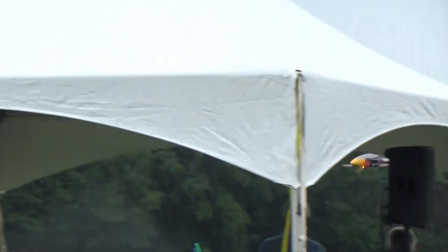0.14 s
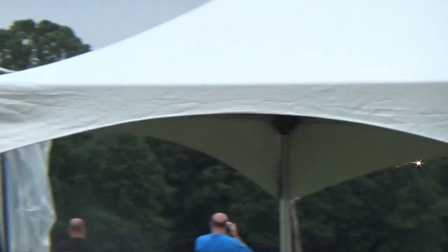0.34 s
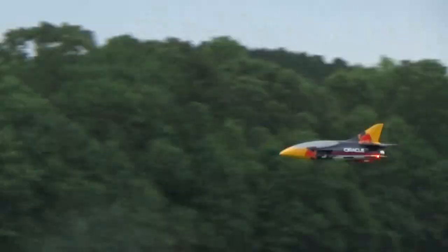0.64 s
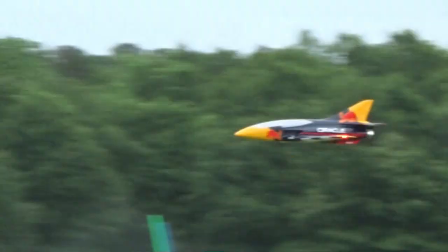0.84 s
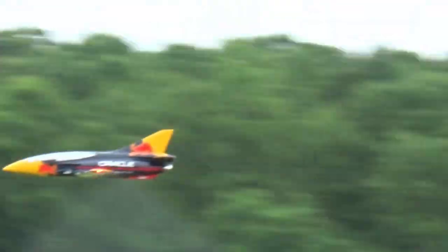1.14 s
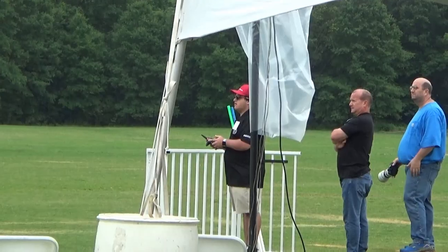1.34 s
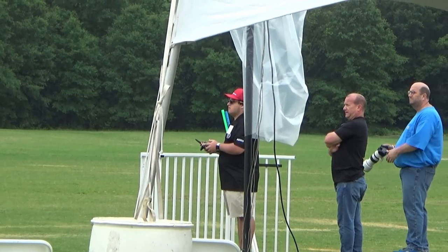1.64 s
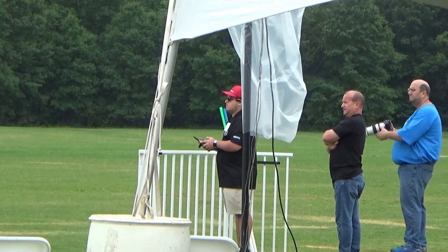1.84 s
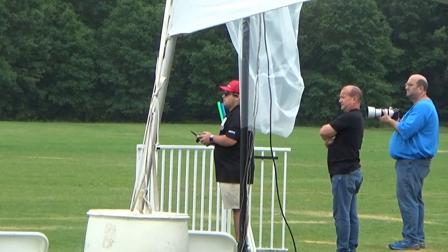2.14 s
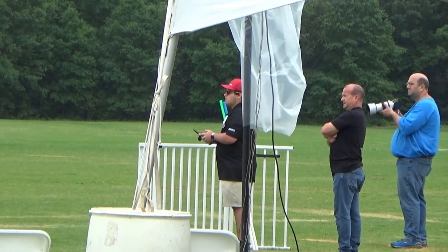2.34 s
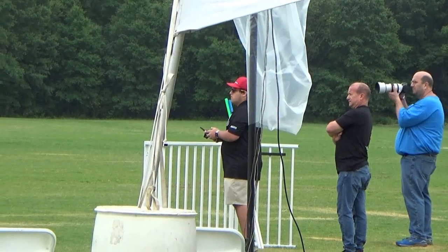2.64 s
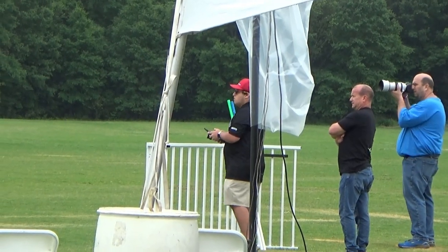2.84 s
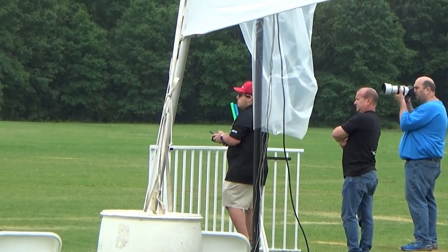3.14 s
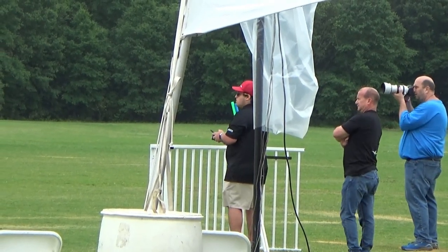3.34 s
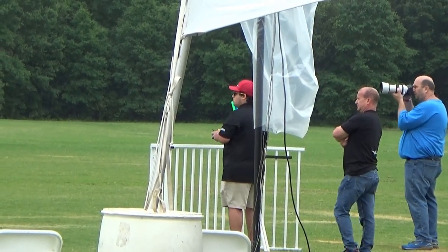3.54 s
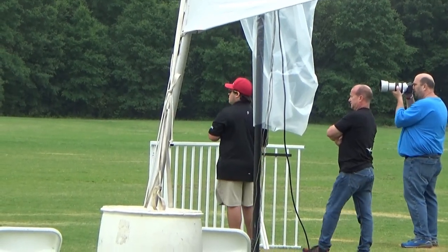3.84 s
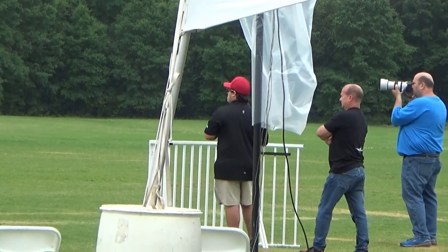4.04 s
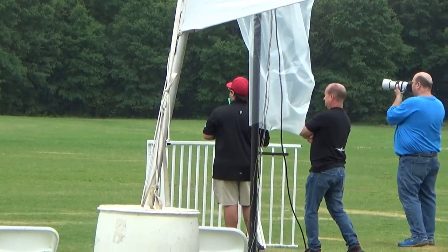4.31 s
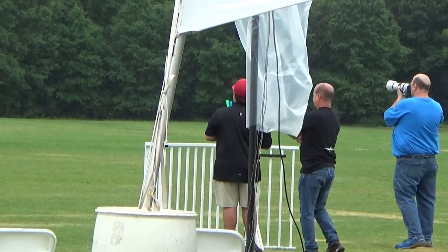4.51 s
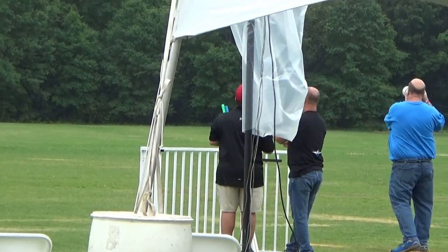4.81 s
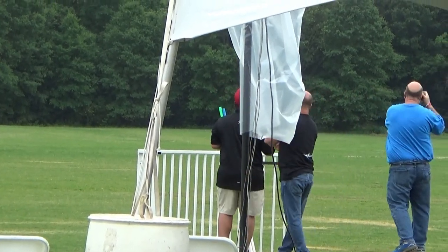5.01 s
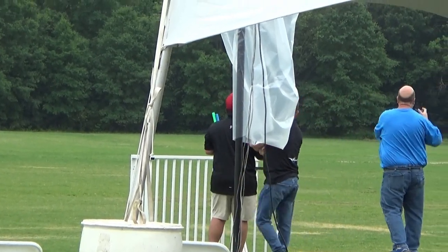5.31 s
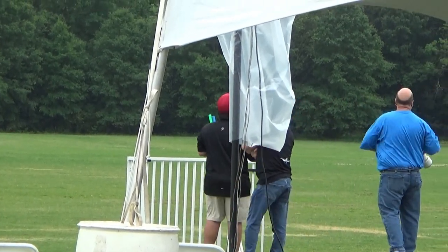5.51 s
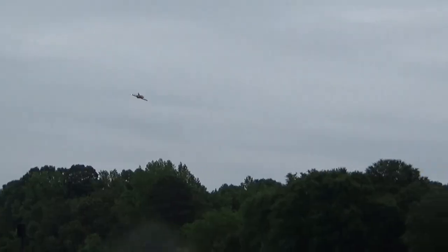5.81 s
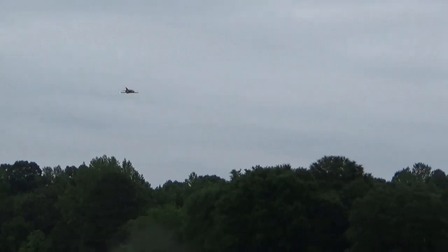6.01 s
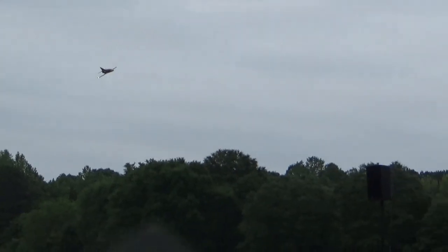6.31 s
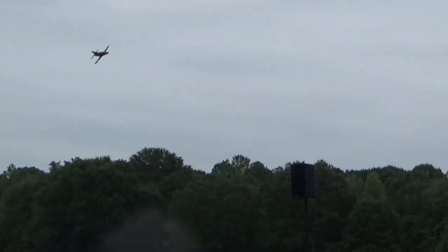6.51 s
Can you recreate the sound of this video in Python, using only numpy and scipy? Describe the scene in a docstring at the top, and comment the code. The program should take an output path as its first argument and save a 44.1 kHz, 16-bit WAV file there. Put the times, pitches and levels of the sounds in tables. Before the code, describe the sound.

From 0 s a small model jet approaches over grass, its flickering exhaust thin and strong in the upper mids, with a wavering turbine tone near 800 Hz. At about 0.45 s the roar jumps fuller, and near 1 s a very high blade whine slides down. At 1.34 s the sound cuts off almost completely, returning by 1.4 s as a quiet, dull roar leaning left. Faint ticks come at 1.7 and 1.9 s, a whistle around 2 kHz swells to 2.4 s, and wind bumps at 2.5 s. The roar grows, its shaft tone falling from 2.75 to 4.3 s; treble opens up, hissiest near 4.9 s, then darkens. At 5.76 s a third pass starts abruptly: dull roar, wind, two tiny ticks near 5.87 s, and breathy whistles, strongest near 1.7 kHz at 6.2 s, fading before the abrupt end around 6.6 s.

```python
"""The exhaust roar of a small model jet passes over a grass field three times, one pass straight after another.
Noise in narrow bands makes the roar; an upside-down echo from the grass thins it, and moving air makes it flicker.
Sine waves make the turbine's shaft tone and blade whine, which fall in pitch as the jet goes by, and some whistles.
Wind noise and faint ticks lie around it, and the sound drops out briefly between the first two passes."""
import sys
import numpy as np
from scipy import signal
from scipy.fft import rfft, irfft
from scipy.io import wavfile
from scipy.ndimage import map_coordinates

SR = 44100
rng = np.random.default_rng(int(sys.argv[2]) if len(sys.argv) > 2 else 0)


def to_wav(s):
    """Save 16-bit WAV."""
    ch = np.atleast_2d(s).T  # columns
    pcm = np.round(np.clip(ch, -1, 1) * 32767)  # PCM
    wavfile.write(sys.argv[1], SR, pcm.astype(np.int16))


N = 293706  # length in samples
TIME = np.arange(N) / SR  # seconds
HZ = np.maximum(np.fft.rfftfreq(N, 1 / SR), 1)  # pitch of each spectrum point, kept above zero for the logarithm

# Exhaust loudness before flicker, one table a pass: start_s, roar_db, upper_mids_over_roar_db, treble_over_roar_db
EXHAUST_LEVELS = [
    [(0.0, -30, 15.5, -1), (0.06, -34, 20.5, -2), (0.17, -29.5, 10, 4.5), (0.33, -30, 16.5, -5),
     (0.45, -20, 0.5, -9), (0.54, -25.5, 6, -3), (0.67, -24.5, 3.5, -1.5), (0.76, -19.5, -1, -7),
     (0.9, -22.5, -0.5, -1), (1.1, -24, 0, -1), (1.34, -23.5, -1.5, 2.5)],
    [(1.4, -36, -2, -32), (1.7, -32, 0.5, -29.5), (2.1, -30, 0, -26.5), (2.5, -27, 0.5, -25),
     (2.72, -24, 0.5, -26), (2.94, -25.5, 6, -16.5), (3.2, -22, 3, -16), (3.6, -21, 0.5, -12),
     (3.85, -23, -1.5, -4.5), (4.15, -23.5, -0.5, -5), (4.5, -27, 4.5, -0.5), (4.9, -26, 3.5, 5.5),
     (5.05, -23, 1.5, -1), (5.22, -22.5, 1, -1), (5.38, -23, 1, -8), (5.52, -24.5, -3, -6.5),
     (5.65, -24.5, -5, -15.5), (5.75, -21.5, -3.5, -17)],
    [(5.77, -26, -4.5, -22.5), (5.93, -30.5, -2.5, -20), (6.05, -26.5, -0.5, -15), (6.2, -22, -1.5, -16.5),
     (6.33, -25, -1, -17.5), (6.42, -24, 3, -9), (6.5, -23.5, -1, -25.5), (6.66, -26, 0, -13)],
]
# Wind loudness and the jet's side, one table a pass: start_s, wind_db, left_over_right_db
WIND_AND_SIDE = [
    [(0.0, -47, 0), (0.04, -49, -1.5), (1.33, -45, -1.0)],
    [(1.45, -46, 5), (2.37, -42, 5), (2.48, -28, 5), (2.55, -37, 5), (4.16, -50.5, 6), (4.58, -65, 3),
     (5.14, -63, -0.5), (5.57, -49, -1.0), (5.75, -63, -2.0)],
    [(5.8, -37, 2), (5.89, -35, 1.5), (6.66, -41, 1.5)],
]
# Pitch range in which each layer's level is set (wind, rumble, roar, upper mids, hiss, treble): low_hz, high_hz
LAYER_RANGES = [(30, 130), (130, 400), (500, 1500), (1500, 3200), (3200, 6500), (7500, 14000)]
# Moments at which the next pass takes over: start_s of the second, start_s of the third
PASS_CHANGES = (1.36, 5.763)
# Echo from the ground, later the higher the jet stands, before the air moves it: start_s, delay_ms, strength (0-1)
GROUND_ECHO = [(0.0, 0.45, 0.3), (0.62, 0.465, 0.3), (0.78, 0.505, 0.6), (1.1, 0.59, 0.58),
               (1.345, 0.52, 0.72), (1.37, 1.25, 0.25), (2.1, 1.23, 0.32), (2.9, 1.055, 0.32),
               (3.49, 0.9, 0.62), (3.8, 0.76, 0.6), (4.27, 0.64, 0.62), (4.53, 0.625, 0.74),
               (4.75, 0.545, 0.66), (4.95, 0.54, 0.68), (5.2, 0.67, 0.62), (5.76, 0.86, 0.38),
               (5.77, 1.225, 0.45), (6.66, 1.24, 0.5)]
# Tone colour of the exhaust noise: pitch_hz, level_db (per Hz, before the layer levels)
EXHAUST_COLOUR = [(25, -10), (60, -5), (150, -3), (330, -11), (650, -4.5), (1600, -1), (3000, -3.5),
                  (5000, -5.5), (7000, -11.5), (9000, -9), (11500, -14.5), (14000, -25.5), (16000, -33)]
# Spread-out noise with opposite signs left and right: pitch_hz, level_db (relative to the exhaust colour)
DIFFUSE_LEVELS = [(40, -16), (200, -19), (1000, -15), (3000, -15), (6000, -13), (9000, -17), (14000, -24)]
# Stretches in which the turbine shaft stands out: start_s, end_s, level_db
SHAFT_STRETCHES = [(0.001, .44, -36), (.8, 1.1, -38.5), (1.24, 1.34, -44), (2.75, 3.3, -30),
                   (3.42, 3.88, -30), (3.98, 4.28, -31.5)]
# Compressor blade whine, heard as the jet comes abreast: start_s, end_s, level_db
BLADE_STRETCHES = [(.96, 1.34, -37.5), (3.99, 4.52, -50)]
# Airframe whistles: start_s, loudest_s, end_s, pitch_hz (when loudest), glide_hz_per_s, level_db (when loudest)
WHISTLE_SWELLS = [(1.65, 2.42, 2.56, 2057, 90, -35), (5.78, 5.8, 5.93, 1558, -40, -34),
                  (5.92, 6.22, 6.58, 1673, 5, -24), (5.7, 6.1, 6.8, 994, -5, -35),
                  (5.92, 6.35, 6.6, 2484, 10, -33)]
# Faint ticks: start_s, level_db (of the envelope at the start, before the high-pass filter)
TICK_STARTS = [(1.6854, -36), (1.8896, -35), (5.8551, -33), (5.8855, -29)]
# Steady offset added to the sound: start_s, end_s, left (full scale is 1), right (full scale is 1)
HELD_OFFSET = (1.3447, 1.3678, -.068, -.044)
# Straight flight lines: nearest_s, distance_m, shaft_hz, blade_whine_hz (both as heard at nearest_s)
FLIGHT_LINES = [(1.252, 25.1, 735, 14390), (4.28, 31.3, 756, 14633)]
# Levels that follow the exhaust controls: base_db, share_of_roar, share_of_upper_mids, share_of_treble
HISS_MIX = (-15, 0.4061, 0.24, 0.6175)
RUMBLE_MIX = (-22, 0.356, -0.38, 0.1)
# Short moment in which the next pass leaks through: start_s, end_s, level_db
LEAK = (1.375, 1.3785, 5)

GRASS_TURN_RAD, GRASS_DULL_HZ = 1.5, 5500  # phase lead of the echo, and where its treble fades
SPEED_M_S, SOUND_M_S = 53.5, 343  # speed of the jet and of sound
WHISTLE_ENDS_DB = -14  # level at both ends of a whistle, relative to its loudest point
CUT_S, RESUME_S, FADE_IN_S = 1.3447, 1.38, .014
CUT_TAIL_DB, CUT_TAIL_DB_PER_S, GAP_DB = -16, -2000, -22
CUTOFF_HZ = 16300  # top of the sound


def from_db(db):
    """Turn decibels into a gain."""
    return 10 ** (np.asarray(db) / 20)


def in_time(rows):
    """Join the points of each column with straight lines, one value a sample."""
    s, *columns = np.transpose(rows)
    return np.array([np.interp(TIME, s, column) for column in columns])


def by_pass(tables):
    """Let each pass play its own table, switching at once."""
    pass_number = np.searchsorted(PASS_CHANGES, TIME)
    return np.choose(pass_number, [in_time(rows) for rows in tables])


def at_hz(points, hz):
    """Read a spectrum with pitch spaced by octaves, as we hear it."""
    points = np.array(points)
    return np.interp(np.log(hz), np.log(points[:, 0]), points[:, 1])


def drift(rate_hz):
    """Wander at random around zero, with a spread of about 1; a higher rate wanders faster."""
    # made at one value every 40 samples; the first 2000 let the filter settle
    r = np.exp(-80 * np.pi * rate_hz / SR)
    noise = rng.standard_normal(N // 40 + 2002)
    slow = signal.lfilter([1], [1, -2 * r, r * r], noise)[2000:]
    return np.interp(np.arange(N) / 40, np.arange(len(slow)), slow / slow.std())


def later(x, samples):
    """Delay x by a number of samples that may vary."""
    return map_coordinates(x, [np.arange(N) - samples], order=3, mode="nearest")


def off_ground(x, shimmer=.025, waver=.15):
    """Add the inverted, duller echo from the grass, which cancels some pitches; moving air shakes its delay."""
    delay_ms, strength = in_time(GROUND_ECHO)
    dulling = 1 / (1 + (HZ / GRASS_DULL_HZ) ** 2) ** .5
    echo = irfft(rfft(x) * np.exp(1j * GRASS_TURN_RAD) * dulling, N)
    delay_samples = delay_ms / 1000 * SR
    echo = later(echo, delay_samples * (1 + shimmer * drift(24.0)))
    strength = np.clip(strength * (1 + waver * drift(10)), 0, 1)
    return (x - strength * echo) / np.sqrt(1 + strength ** 2)


def band_levels():
    """Give the levels in dB of wind, rumble, roar, upper mids, hiss and treble."""
    roar, mids, treble = controls = by_pass(EXHAUST_LEVELS)
    hiss, rumble = [db + np.dot(shares, controls) for db, *shares in (HISS_MIX, RUMBLE_MIX)]
    wind = by_pass(WIND_AND_SIDE)[0]
    return np.array([wind, rumble, roar, roar + mids, hiss, roar + treble])


def exhaust(patchy_db=1.72, gust_db=0.5, gust_per_octave=0.93):
    """Shape turbulent noise and wind in third-octave bands; return the aimed, centred and diffuse parts."""
    colour = from_db(at_hz(EXHAUST_COLOUR, HZ))
    direct = rfft(off_ground(rng.standard_normal(N))) * colour
    diffuse = rfft(rng.standard_normal(N)) * colour * from_db(at_hz(DIFFUSE_LEVELS, HZ))
    # divide out the power the coloured noise already has in each layer
    power = [2 * np.sum(colour[(HZ > low) & (HZ < high)] ** 2) / N for low, high in LAYER_RANGES]
    levels = band_levels() - 10 * np.log10(power)[:, None]
    layer_octaves = np.log2([70, 230, 900, 2300, 4700, 10500])  # middle of each layer, from Hz
    gust = drift(14)
    out = np.zeros((3, N))
    for octave in np.arange(4.5, 14.4, 1 / 3):
        window = np.cos(np.pi / 2 * np.clip(3 * (np.log2(HZ) - octave), -1, 1)) ** 2
        # how much of each layer's level this band takes
        between = np.array([np.interp(octave, layer_octaves, row) for row in np.eye(6)])
        # scattering in moving air makes the treble flicker most
        gust_here_db = gust_db * max(0, 1 + gust_per_octave * (octave - 11))
        flicker = gust_here_db * gust + patchy_db * drift(9.9)
        gain = from_db(between @ levels + flicker)
        # only the middle pitches have a direction
        aimed = np.interp(2 ** octave, [220, 600, 6000, 9000], [0, 1, 1, 0])
        band = gain * irfft(direct * window, N)
        out += [aimed * band, (1 - aimed) * band, gain * irfft(diffuse * window, N)]
    return out


def passing(stretches, column):
    """Bend a steady tone on the jet: motion raises its pitch on the way in and lowers it on the way out."""
    curves = []
    for start, end, db in stretches:
        jet = FLIGHT_LINES[np.searchsorted(PASS_CHANGES, start)]
        s = np.linspace(start, end, 40)
        along_m = SPEED_M_S * (s - jet[0])
        receding = along_m / np.hypot(along_m, jet[1])  # share of the speed that points away
        hz = jet[column] / (1 + SPEED_M_S / SOUND_M_S * receding)
        curves.append(np.transpose([s, hz, db + 0 * s]))
    return curves


def tones(curves, waver, flutter_db, blur_db, fade_s=0.06):
    """Play sines that waver in pitch and level; moving air blurs each line into a narrow band."""
    out = np.zeros(N)
    for rows in curves:
        hz, db = in_time(rows)
        # fades lie just outside the stretch
        inside_s = np.minimum(TIME - rows[0][0], rows[-1][0] - TIME)
        on = np.clip(inside_s / fade_s + 1, 0, 1)
        turn = np.exp(2j * np.pi * np.cumsum(hz * (1 + waver * drift(18))) / SR)
        blur = from_db(blur_db) * (drift(54) + 1j * drift(27))
        level = np.sqrt(2) * on * from_db(db + flutter_db * drift(8.9))
        out += level * np.real(turn * (1 + blur))
    return out


def shaft_tone():
    """Sound the turning turbine shaft as a wavering sine bent by the jet's motion."""
    return tones(passing(SHAFT_STRETCHES, column=2), waver=.003, flutter_db=2, blur_db=-10)


def blade_whine():
    """Sound the compressor blades as a high, blurred sine bent by the jet's motion."""
    return tones(passing(BLADE_STRETCHES, column=3), waver=.002, flutter_db=3.5, blur_db=-3, fade_s=.02)


def dropout():
    """Give a gain with a sudden cut and short tail, a quiet gap with a leak, then a fade in."""
    tail_db = CUT_TAIL_DB + CUT_TAIL_DB_PER_S * np.abs(TIME - CUT_S)
    tail = np.where(TIME < CUT_S, 1, from_db(tail_db))
    rise = from_db(GAP_DB * np.clip(1 - (TIME - RESUME_S) / FADE_IN_S, 0, 1))
    leak_start, leak_end, leak_db = LEAK
    rise = np.where((TIME > leak_start) & (TIME < leak_end), from_db(leak_db), rise)
    return np.where(TIME < PASS_CHANGES[0], tail, rise)


def whistles():
    """Sound airframe whistles as gliding sines that swell to their loudest and die away."""
    curves = []
    for start, top, end, hz, glide, db in WHISTLE_SWELLS:
        curves.append([(s, hz + glide * (s - top), db + WHISTLE_ENDS_DB * (s != top)) for s in (start, top, end)])
    return tones(curves, waver=.003, flutter_db=2, blur_db=-5, fade_s=.03)


def ticks(decay_ms=1.5):
    """Make short bright bursts of noise that start at once and die away quickly."""
    envelope = np.zeros(N)
    for s, db in TICK_STARTS:
        age = TIME - s
        envelope += from_db(db) * (age > 0) * np.exp(-np.maximum(age, 0) * 1000 / decay_ms)
    bright = signal.butter(2, 7000, "high", fs=SR, output="sos")
    return signal.sosfilt(bright, envelope * rng.standard_normal(N))


def scene(lag_per_db=.36):
    """Mix in stereo: the aimed sounds differ in level and arrival time between the two channels."""
    aimed, centre, diffuse = exhaust()
    aimed = aimed + shaft_tone() + whistles()
    centre = centre + blade_whine() + ticks()
    side_db = by_pass(WIND_AND_SIDE)[1]
    left_gain = 2 / (1 + from_db(-side_db))
    right_gain = 2 / (1 + from_db(side_db))
    # lag in samples: the left channel lags when the jet is louder there, and leads when it is softer
    left = centre + left_gain * later(aimed, lag_per_db * side_db) + diffuse
    right = centre + right_gain * aimed - diffuse
    return np.array([left, right])


def record(dry):
    """Apply the dropout, hold a steady offset in each channel during it, and cut the highest pitches."""
    start, end, *offsets = HELD_OFFSET
    held = np.outer(offsets, (TIME > start) & (TIME < end))
    joined = dry * dropout() + held
    top_cut = signal.cheby2(14, 70, CUTOFF_HZ, fs=SR, output="sos")
    return signal.sosfilt(top_cut, joined)


dry = scene()
out = record(dry)
to_wav(out)
```